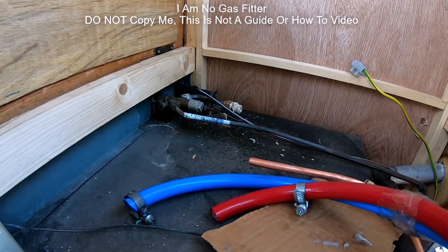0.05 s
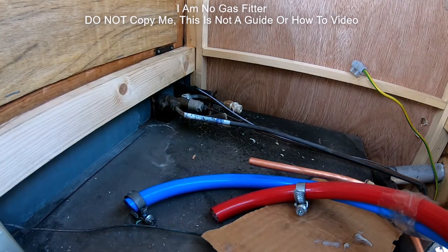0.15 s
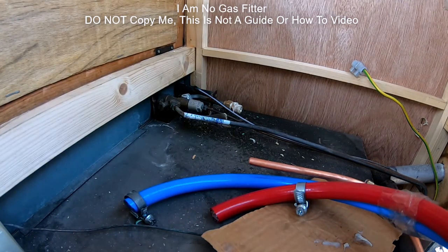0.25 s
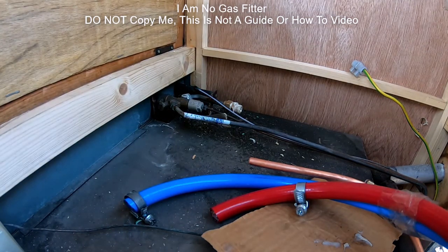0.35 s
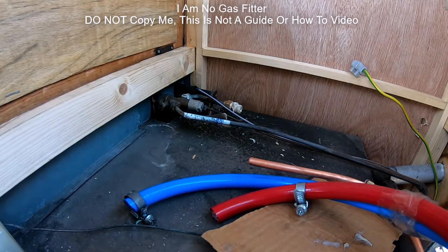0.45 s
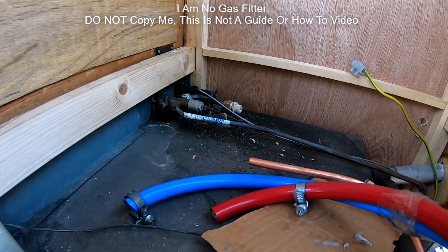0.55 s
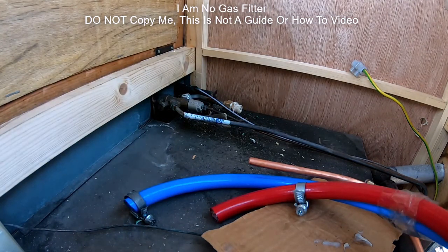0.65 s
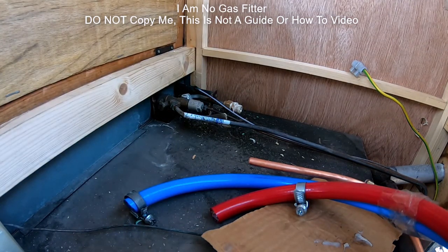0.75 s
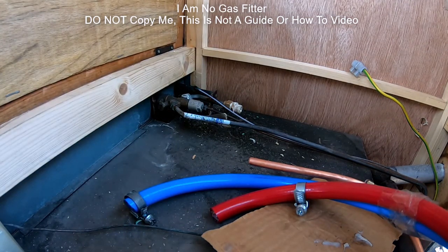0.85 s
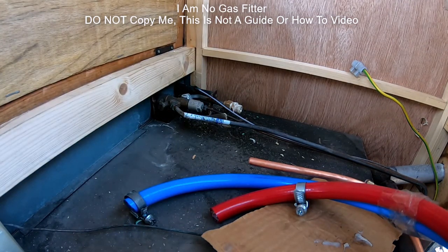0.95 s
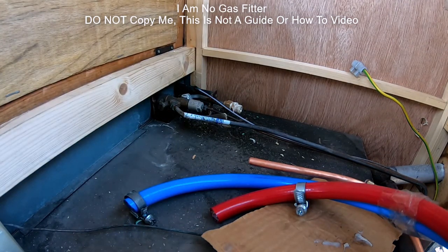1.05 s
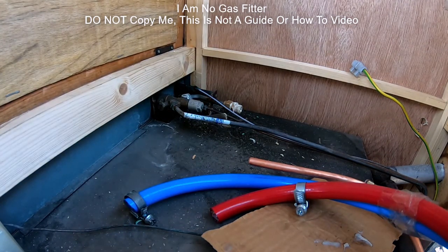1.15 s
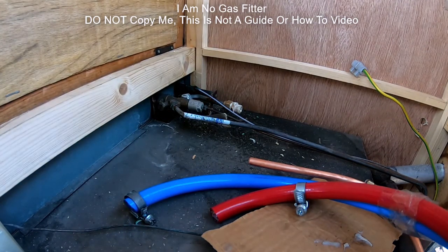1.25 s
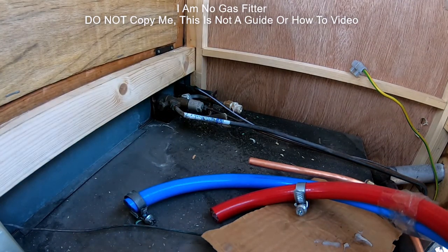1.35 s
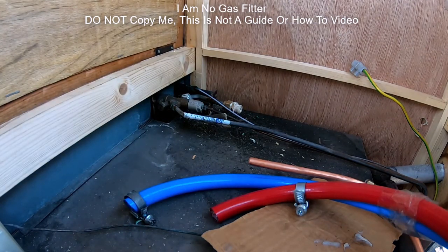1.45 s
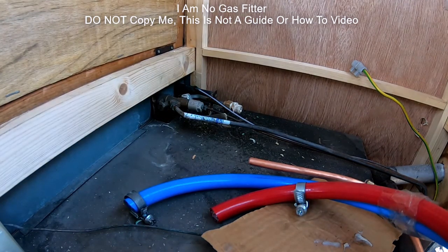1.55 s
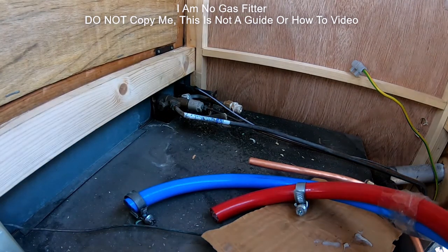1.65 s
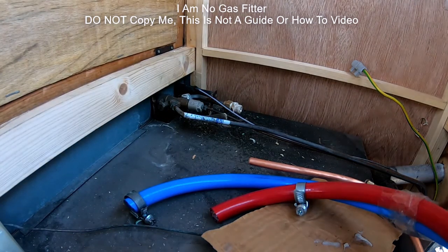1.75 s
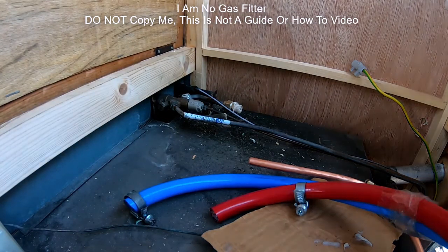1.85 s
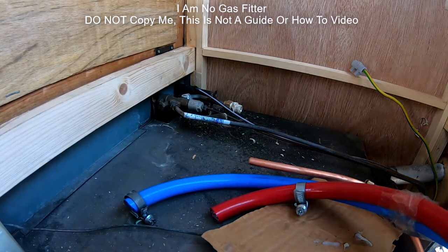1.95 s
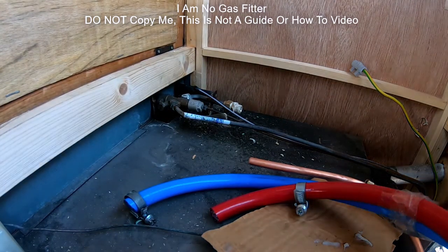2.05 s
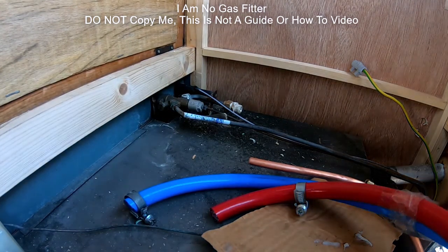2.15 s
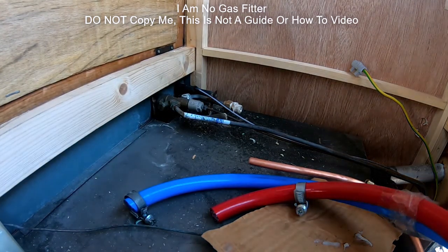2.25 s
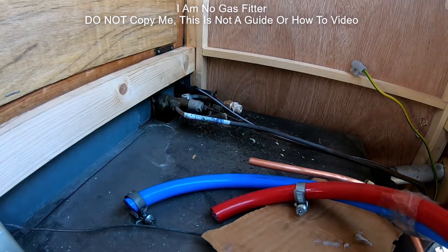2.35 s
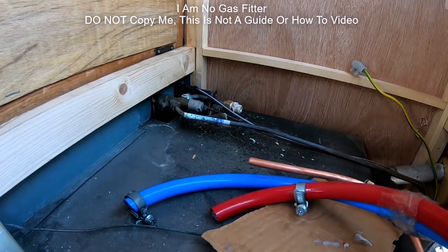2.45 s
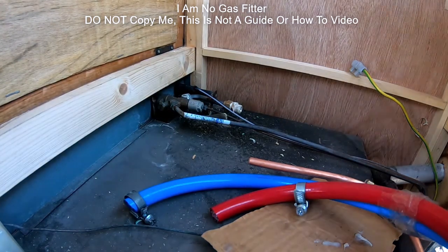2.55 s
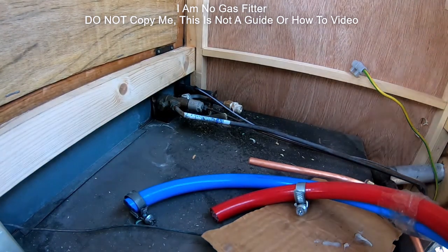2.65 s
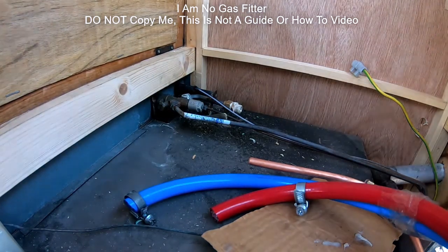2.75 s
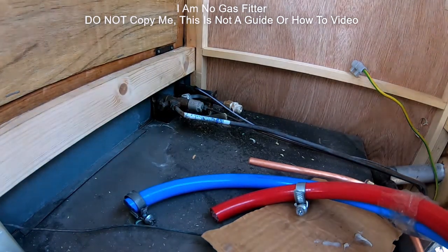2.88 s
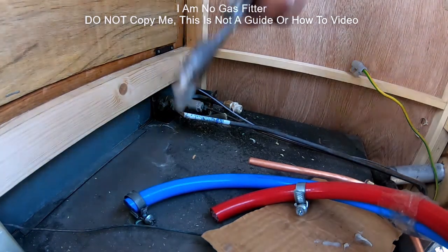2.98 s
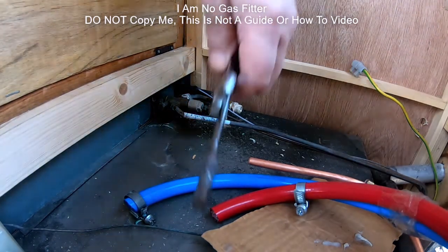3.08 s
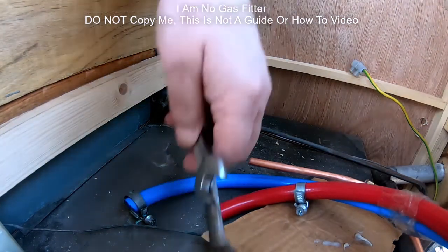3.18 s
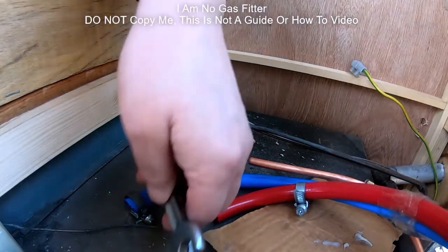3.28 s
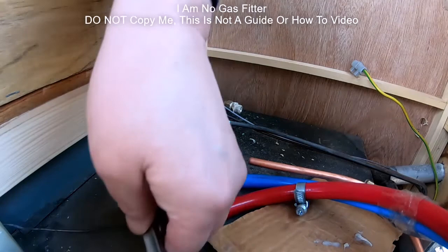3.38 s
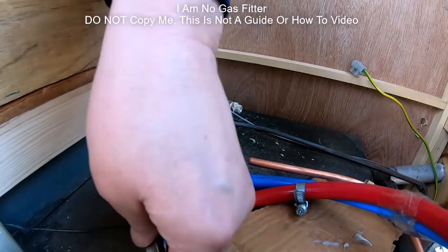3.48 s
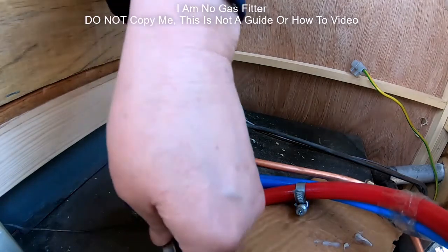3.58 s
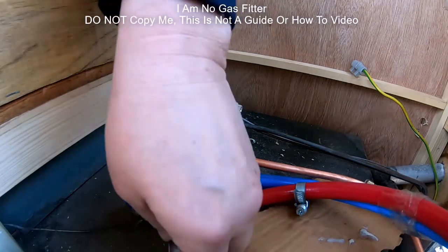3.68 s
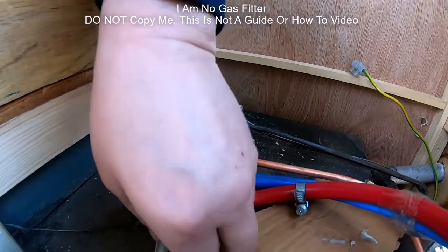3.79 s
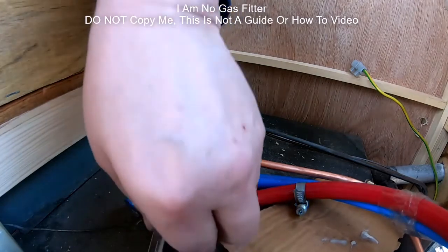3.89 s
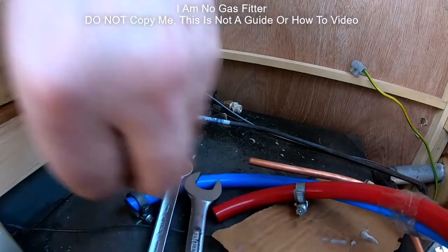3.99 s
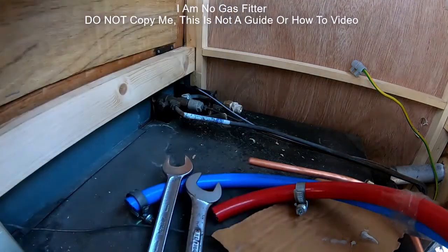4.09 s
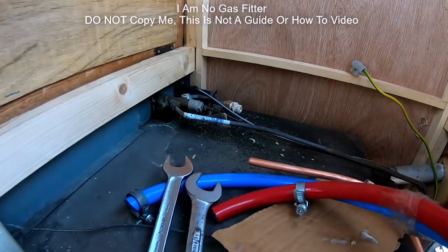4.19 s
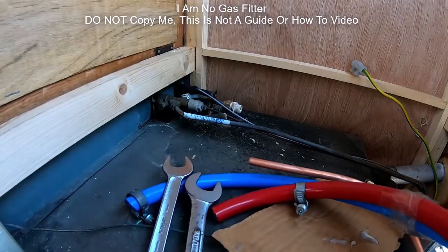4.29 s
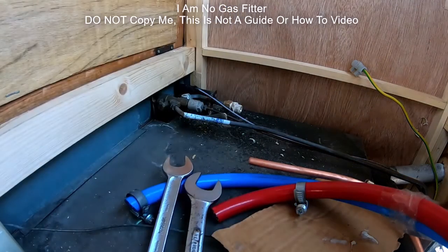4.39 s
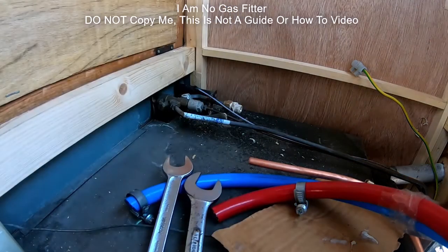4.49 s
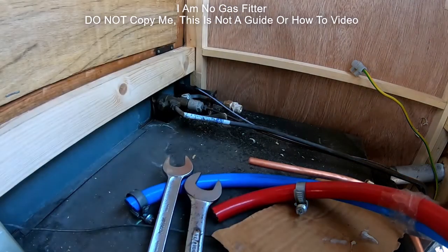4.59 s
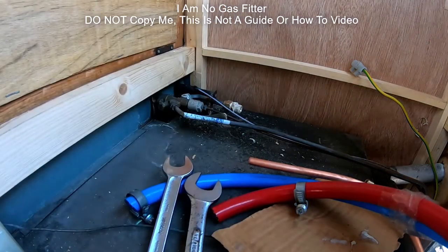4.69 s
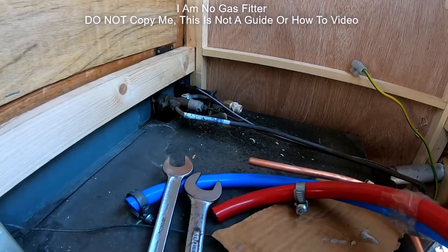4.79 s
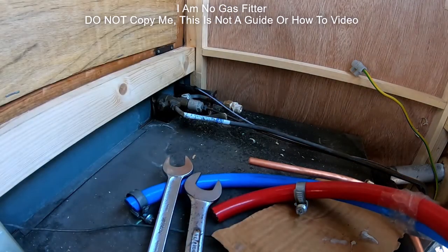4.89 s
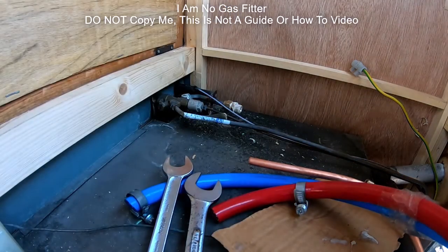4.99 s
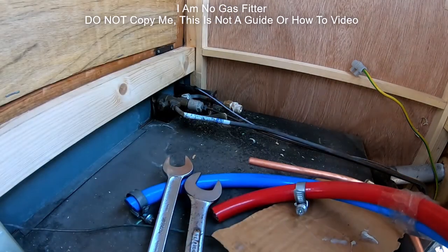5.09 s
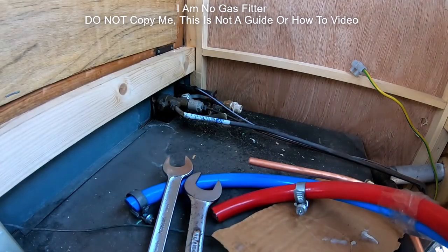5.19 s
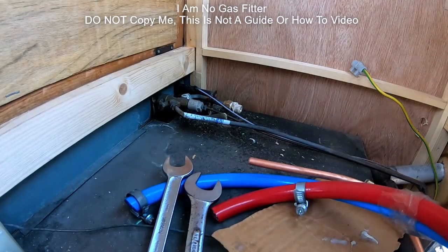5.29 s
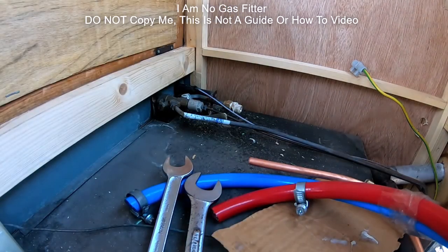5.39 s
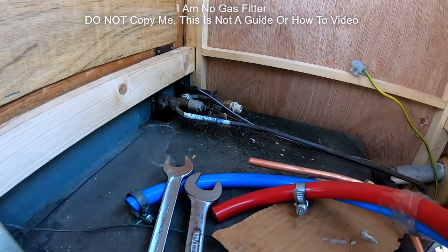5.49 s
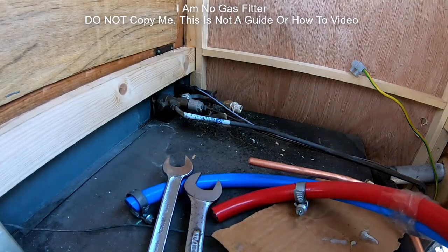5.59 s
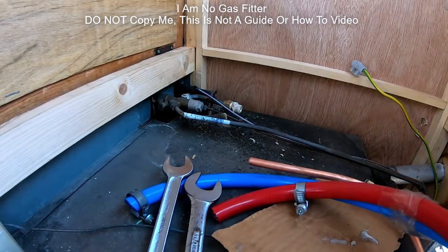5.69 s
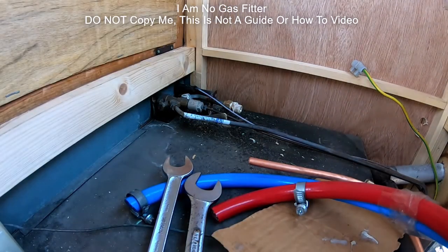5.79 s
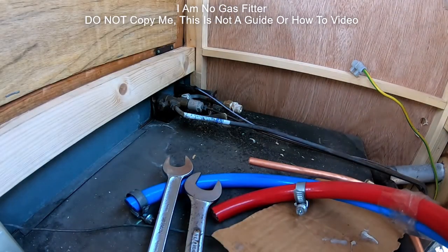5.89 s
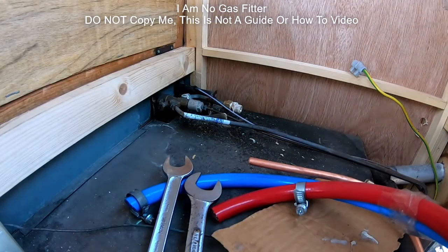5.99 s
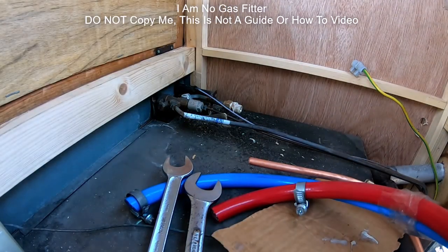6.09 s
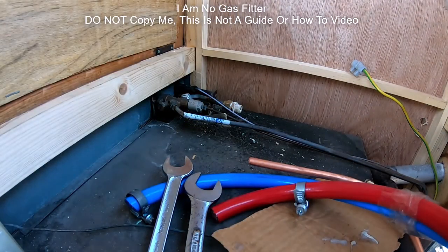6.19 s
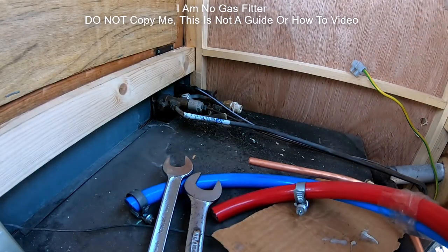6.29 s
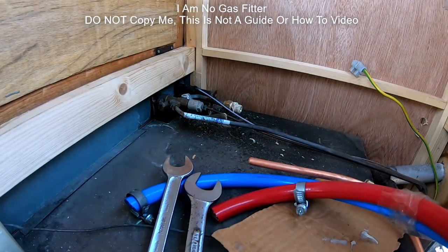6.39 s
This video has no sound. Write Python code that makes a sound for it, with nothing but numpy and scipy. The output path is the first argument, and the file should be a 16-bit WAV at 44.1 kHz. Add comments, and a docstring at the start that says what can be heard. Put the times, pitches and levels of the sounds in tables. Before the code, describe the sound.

Small fittings knock on wood in a van, two steel spanners clink, then clatter onto a hollow floor, one rocking quickly to rest.

```python
"""Two spanners in a plywood-lined van

Hands knock about among small fittings and pick up two steel spanners, which slide and clink together.
The spanners are laid on the hollow floor, clatter, and one rocks to rest. Sleeves rustle over a low hum.
Blows are filtered noise bursts with damped modes; sliding is a train of such contacts; cloth, rumble and
air are shaped noise; the hum is a wavering sine."""
import sys
import numpy as np
from scipy import signal
from scipy.fft import rfft, irfft, next_fast_len
from scipy.io import wavfile
from scipy.ndimage import map_coordinates

SR = 44100
rng = np.random.default_rng(int(sys.argv[2]) if len(sys.argv) > 2 else 0)


def log_audio(samples):
    """Write samples as a 16-bit WAV file to the path given in sys.argv[1]."""
    # one column per channel
    frames = np.atleast_2d(samples).T
    # limit to full scale, then quantise
    limited = np.clip(frames, -1, 1)
    pcm = np.round(limited * 32767).astype(np.int16)
    wavfile.write(sys.argv[1], SR, pcm)


N = 283987
TIME = np.arange(N) / SR
RING = np.arange(SR * 3 // 4) / SR  # time after a blow, s

# modes of the larger and the smaller spanner, ringing freely: (f/Hz, level/dB, t60/s)
LARGE_MODES = [(2010, -17, 0.41), (3336, -5.5, 0.31), (4400, 6.5, 0.26), (7542, -5.5, 0.47),
               (11890, -14, .35), (12526, -24, .25), (13500, -30, .2), (14950, -27.5, .3)]
SMALL_MODES = [(1540, -20.5, 0.35), (2140, -20, 0.19), (2240, -13, .2), (3345, -6.5, 0.18),
               (5426, -1.5, 0.24), (5477, -3, .12), (6860, -13.5, 0.38), (7780, -7.5, 0.27),
               (8140, -2, 0.2), (9670, -22, 0.38), (10500, -17, .16), (11300, -18.5, .2)]
# panel modes of the hollow floor: (f/Hz, level/dB, t60/s)
FLOOR_MODES = [(79.9, -16, 0.58), (147.8, -2, 0.15), (179.3, 4, 0.15), (244.8, 1, 0.18), (287.7, 1, 0.12),
               (395, -6.5, .08), (457.3, 6.5, 0.14), (579, -7.5, 0.13), (673.4, -1.5, 0.099)]
# deep sway of the van's floor: (f/Hz, relative level/dB)
SWAY_SPECTRUM = [(15, -15.5), (30, -11), (50, 2), (75, -0.5), (120, -11.5), (250, -26), (800, -77)]


def amp(db):
    """Level as the logarithm of amplitude: decibels to gain."""
    return 10 ** (np.asarray(db) / 20)


def unit(x):
    """Normalisation by mean power: scale to rms 1."""
    return x / np.sqrt(np.mean(x ** 2) + 1e-20)


def along(points, hz):
    """Logarithmic frequency scale: interpolate (f/Hz, value) points on it."""
    f, v = np.transpose(points)
    return np.interp(np.log(hz + 1), np.log(f + 1), v)


def shape(points):
    """Spectral envelope: level in dB as a function of frequency."""
    return lambda hz: along(points, hz)


def rippled(points, ripple_db, spacing_hz):
    """Local resonance and cancellation: random peaks and dips mark one particular contact spot."""
    knots = rng.standard_normal(512)

    def level(hz):
        ripple = map_coordinates(knots, [hz / spacing_hz], mode="mirror")
        return along(points, hz) + ripple_db * ripple
    return level


def wobble(rate, size=N):
    """Slow random modulation: a smooth curve through rate knots a second."""
    knots = rng.standard_normal(int(size * rate / SR) + 4)
    return map_coordinates(knots, [np.arange(size) * rate / SR])


def coloured(x, level):
    """Minimum-phase filtering: the folded cepstrum makes a causal filter of gain level(Hz) in dB."""
    size = x.shape[-1]
    m = 2 * next_fast_len(size // 2 + 2048)
    log_gain = np.log(amp(level(np.fft.rfftfreq(m, 1 / SR))))
    cepstrum = irfft(log_gain, m)
    cepstrum[1:m // 2] *= 2
    cepstrum[m // 2 + 1:] = 0
    return irfft(rfft(x, m) * np.exp(rfft(cepstrum)), m)[..., :size]


def diffuse(size):
    """Diffuse-field coherence: stereo noise, alike in both channels in the bass, unrelated in the treble."""
    # f/Hz, side minus mid level/dB
    width = [(60, -14.5), (250, -13), (500, -3), (800, -1.5), (1200, 2), (2000, -3), (4000, -2.5),
             (8000, 2.5)]
    mid, side = rng.standard_normal((2, size))
    side = coloured(side, shape(width))
    return unit(np.array([mid + side, mid - side]))


def add(track, s, sound):
    """Superposition: mix a sound into a track at s seconds."""
    part = track[:, round(s * SR):][:, :sound.shape[-1]]
    part += sound[..., :part.shape[1]]


def impact(level, direct_db, t60, late_db, late_t60):
    """Impulse and reverberation: a contact, dense early reflections and a weak late tail."""
    fade = amp(-60 * RING / t60) + amp(late_db - 60 * RING / late_t60)
    echo = diffuse(len(RING)) * fade / np.linalg.norm(fade)
    echo[:, 0] += amp(direct_db)
    # the energy of a 10 ms burst of rms 1
    return unit(coloured(echo, level)) * np.sqrt(SR / (10 * 10 * len(RING)))


def ring(modes, scatter_db, apart):
    """Modal decay: damped sines of random strength, each with opposite phase shifts left and right."""
    out = np.zeros((2, len(RING)))
    for k, (hz, db, t60) in enumerate(modes):
        strength, skew = rng.standard_normal(2)
        phase = apart * skew * np.array([[1], [-1]])
        decay = amp(db + scatter_db * strength - 60 * RING / t60)
        out += (-1) ** k * decay * np.sin(2 * np.pi * hz * RING + phase)
    return out * (1 - np.exp(-RING / 0.00046))


def bounces(s, db, flight_s, loss_db, count=3):
    """Inelastic rebound: the (s, dB) of a blow and its bounces, each weaker and after a shorter flight."""
    k = np.arange(count)
    flights = flight_s * 0.95 ** k
    return zip(s + np.cumsum(flights) - flights, db - abs(loss_db) * k)


def steel(place):
    """Position-dependent excitation: colour shifts from jaw (0) to shank (1), with new ripples each call."""
    # contact at the jaw and at the shank: f/Hz, relative level/dB
    jaw_spectrum = [(500, -39), (1400, -26.5), (2300, -15.5), (3800, -21.5), (4500, -7.5), (5000, -9),
                    (5600, -3.5), (6800, -16.5), (7600, 3), (8300, -0.5), (9800, -15), (11700, -12),
                    (13800, -30.5), (15500, -39)]
    shank_spectrum = [(600, -40), (1700, -18), (2200, -6.5), (2900, -10.5), (3800, 4), (5300, -14.5),
                      (5900, -9.5), (6800, -22), (7600, -5.5), (8400, -10.5), (9500, -38.5), (11400, -35),
                      (13300, -41.5), (15500, -55.5)]
    place = np.clip(place, 0, 1)
    jaw = rippled(jaw_spectrum, ripple_db=8.0, spacing_hz=169.7)
    shank = rippled(shank_spectrum, ripple_db=3.5, spacing_hz=130.6)
    return lambda hz: (1 - place) * jaw(hz) + place * shank(hz)


def clinks():
    """Damping by the grip: bright cracks rebound, and a freer spanner rings louder and longer."""
    # steel on steel: t/s, level/dB, contact place (0 jaw - 1 shank), loss per rebound/dB
    blows = [(2.174, -29.5, 0.99, 17), (2.326, -16.5, 0, 20), (2.334, -14, 0, 5), (2.389, -25, 0.38, 11),
             (2.432, -12, 0.047, 14.5), (2.577, -41.5, 0.58, 16), (2.702, -32, .9, 16),
             (2.828, -19, 0.69, 20), (3.175, -44.5, 0.39, 20.5), (3.347, -12.5, 0.2, 4),
             (3.42, -26, 0.47, 14.5), (3.482, -19.5, 0.27, 3), (3.514, -19, 0.35, 16),
             (3.571, -18, 0.27, 19), (3.719, -17.5, 0.13, 5), (3.757, -16.5, 0.61, 16.5),
             (3.801, -16.5, 0.59, 12.5), (3.858, -21, 0.86, 14.5), (3.903, -24.5, 0.99, 14),
             (4.071, -44.5, 1, 8)]
    # from gripped in the fist (0) to let go (1): t/s, freedom of large spanner, freedom of small
    freedom_curve = [(2.17, 0.2, 0.4), (2.4, 0.36, 0.4), (2.75, 0.1, 0), (3.4, 0.4, .35), (3.6, 0.07, 0.2),
                     (3.72, 0.45, 0.72), (3.81, 0.99, .88), (3.92, 0.51, 0.89), (4.07, 0.88, .25)]
    free_ring_db, grip_loss_db = 0.5, 26  # boost of a free spanner's modes; loss at zero freedom
    out = np.zeros((2, N))
    times, *freedoms = np.transpose(freedom_curve)
    for start, blow_db, place, loss_db in blows:
        modes = []
        for spanner, freedom in zip([LARGE_MODES, SMALL_MODES], freedoms):
            free = np.clip(np.interp(start, times, freedom), .1, 1)
            gain_db = free_ring_db - grip_loss_db * (1 - free)
            modes += [(hz, db + gain_db, t60 * free) for hz, db, t60 in spanner]
        colour = steel(place)
        for s, db in bounces(start, blow_db, flight_s=0.014, loss_db=loss_db):
            crack = impact(colour, direct_db=-21.0, t60=0.064, late_db=-36, late_t60=0.65)
            add(out, s, amp(db - 6) * (crack + ring(modes, scatter_db=2, apart=0.79)))
    return out


def slides():
    """Stick-slip friction: a stream of tiny contacts keeps the damped modes ringing."""
    # steel sliding on steel: start t/s, length/s, level/dB, contact place (0 jaw - 1 shank)
    strokes = [(2.168, 0.034, -30, 0.73), (2.206, 0.044, -29, 0.42), (2.245, 0.081, -37.5, 0.42),
               (2.388, 0.037, -35, 0.45), (2.482, 0.38, -68, 0.7), (2.736, 0.059, -33.5, 0.94),
               (3.014, 0.056, -48, 0.65), (3.13, 0.032, -57, .8), (3.197, 0.078, -38.5, 0.49),
               (3.283, 0.07, -53, 0.8), (3.325, 0.024, -37.5, 0.63)]
    out = np.zeros((2, N))
    held = [(hz, db, t60 * 0.15) for hz, db, t60 in LARGE_MODES + SMALL_MODES]
    for s, length, db, place in strokes:
        size = int(length * SR)
        swell = np.sin(np.pi * np.arange(size) / size) ** .5
        grains = swell * unit(rng.standard_normal(size) * amp(0.77 * wobble(510, size)))
        contact = impact(steel(place), direct_db=-6.5, t60=0.065, late_db=-32.0, late_t60=0.28)
        body = contact + amp(-15.0) * ring(held, scatter_db=5.5, apart=0.55)
        body /= np.linalg.norm(body[0])
        add(out, s, amp(db) * signal.fftconvolve(grains[None], body, axes=1))
    return out


def landings():
    """Plate radiation: the hollow floor booms and sways, hard contacts clack, the first one rings a pipe."""
    # spanner on floor: t/s, level/dB, hardness/dB, first flight/s, loss per bounce/dB (sign ignored)
    blows = [(3.480, -21.5, 7, 0.013, 14.5), (3.507, -12, 2.5, .009, 10), (3.573, -22.5, 1.5, 0.018, 12.5),
             (3.621, -26.5, 1, 0.034, -0.5), (3.707, -11, -3, .015, 2.5), (3.757, -18, 1, 0.01, -0.5),
             (3.793, -14.5, 3, .013, 6), (3.862, -16.5, -0.5, 0.013, 14), (3.889, -6, -6.5, .015, 1),
             (3.945, -15, -6.5, .018, 1.5), (4.067, -17, -1.5, 0.013, 13.5), (4.082, -11, -4, .018, 6.5)]
    # boom of the floor panel, and clack of the contact: f/Hz, relative level/dB
    panel_spectrum = [(30, -32.5), (90, -9.5), (170, 9.5), (280, 8.5), (345, 6), (450, 5.5), (700, -17),
                      (1000, -35), (1600, -25.5), (3000, -44.5), (8000, -67.5)]
    clack_spectrum = [(200, -21), (500, 3.5), (780, 8), (1100, -1), (1550, 1.5), (2200, -2.5), (3000, -10),
                      (5000, -22.5), (8000, -30), (11000, -46.5)]
    # the board gives under the blow: f/Hz, level/dB, t60/s
    push_modes = [(188.4, -1.5, 0.036), (297, 0, .03), (472, -16.5, 0.017)]
    # a copper pipe brushed on the way down: f/Hz, level/dB, t60/s
    pipe_modes = [(703, -2.5, 0.17), (807, 2, 0.06), (1225, -9, 0.085)]
    out = np.zeros((2, N))
    for start, blow_db, hard_db, flight_s, loss_db in blows:
        for s, db in bounces(start, blow_db, flight_s, loss_db):
            boards = amp(-14) * ring(FLOOR_MODES, scatter_db=4, apart=0.15)
            panel = impact(shape(panel_spectrum), direct_db=-9.0, t60=0.0608, late_db=-20.5, late_t60=0.71)
            spot = rippled(clack_spectrum, ripple_db=5.0, spacing_hz=109.8)
            clack = impact(spot, direct_db=-17, t60=0.14, late_db=-19.5, late_t60=0.23)
            push = amp(-12.0) * ring(push_modes, scatter_db=2.5, apart=0.055)
            add(out, s, amp(db) * (push + boards + amp(-6.0) * panel + amp(hard_db - 13.0) * clack))
        sway = impact(shape(SWAY_SPECTRUM), direct_db=-14, t60=0.13, late_db=-13.5, late_t60=.8)
        add(out, start, amp(blow_db - 21.5) * sway)
    add(out, blows[0][0], amp(-23) * ring(pipe_modes, scatter_db=0.5, apart=0.81))
    return out


def swings(count):
    """Dissipative rocking: the (s, dB, side 0 or 1) of landings that come ever faster and weaker."""
    start_s, swing_s, shrink = 4.1895, .0534, 0.95  # first landing, first swing, ratio of successive swings
    limp_s, limp_shrink = 0.0067, .6  # side 1 lands early at first, then the swings even out
    first_db, loss_db, loss_grows_db = -21, 0.98, 0.036  # mean loss per swing grows as friction takes over
    k = np.arange(count)
    side = k % 2
    lengths = swing_s * shrink ** k
    times = start_s + np.cumsum(lengths) - lengths - side * limp_s * limp_shrink ** k
    return zip(times, first_db - (loss_db + loss_grows_db * k) * k, side)


def rocking():
    """Alternating contact: each swing lands in two steps, jaw then handle, with a faint ring of steel."""
    # jaw, then handle: delay/s, level/dB
    steps = [(0, -10.5), (.0045, -7)]
    # the floor under the rocking spanner: f/Hz, relative level/dB
    floor_spectrum = [(40, -23), (110, 3.5), (180, 13.5), (260, 8.5), (345, 1.5), (470, 1), (560, -2),
                      (680, -11), (900, -31.5), (1250, -51), (1600, -15.5), (2100, -34.5), (3400, -42.5),
                      (8000, -75)]
    # the rocking spanner: f/Hz, level/dB, t60/s
    pivot_modes = [(3290, 6.5, 0.06), (4400, -12, .06), (5440, -3.5, .05), (8130, -1.5, 0.075),
                   (10470, -17, .1)]
    out = np.zeros((2, N))
    for s, db, side in swings(count=14):
        for delay, step_db in steps:
            panel = impact(shape(floor_spectrum), direct_db=-2.5, t60=0.05, late_db=-25, late_t60=.6)
            boards = amp(-17.5) * ring(FLOOR_MODES, scatter_db=0.0, apart=0.071)
            add(out, s + delay, amp(db + step_db) * (panel + boards))
        tick = impact(steel(place=0.94), direct_db=-6, t60=0.053, late_db=-21, late_t60=0.25)
        tick += amp(5.5) * ring(pivot_modes, scatter_db=3.0, apart=0.69)
        # weaker on every second swing
        add(out, s + 0.0019, amp(-74.5 - 7 * side) * tick)
    return out


def knocks():
    """Successive contact: a fitting meets wood in three steps that share one spot's resonances."""
    # fittings knocked against wood: t/s, level/dB
    blows = [(0.526, -25), (0.574, -39), (0.631, -27.5), (1.168, -46.5), (1.617, -44.5), (1.664, -36),
             (1.821, -37.5), (2.099, -38), (4.867, -49), (4.902, -46)]
    # an edge touches, the face lands, it settles: delay/s, level/dB
    steps = [(0, -3), (.007, 0.5), (.022, -14)]
    # f/Hz, relative level/dB
    wood_spectrum = [(60, -14.5), (150, 3.5), (250, 9), (390, -9.5), (500, -5), (620, -8), (800, -4.5),
                     (1080, -3.5), (1450, -11.5), (1750, -12.5), (2600, -25), (3500, -35), (8000, -64),
                     (14000, -70)]
    out = np.zeros((2, N))
    for s, db in blows:
        spot = rippled(wood_spectrum, ripple_db=3, spacing_hz=102)
        for delay, step_db in steps:
            contact = impact(spot, direct_db=-11.0, t60=0.089, late_db=-16.5, late_t60=.25)
            add(out, s + delay, amp(db + step_db - 5) * contact)
    return out


def thumps():
    """Soft excitation: padded thumps drive mostly the low frequencies of the plywood."""
    # t/s, level/dB
    blows = [(2.239, -15), (4.873, -35.5), (5.312, -32.5), (5.45, -19), (5.478, -40)]
    # f/Hz, relative level/dB
    plywood_spectrum = [(30, -32), (70, -2.5), (120, -2), (185, 5), (300, -6.5), (430, -15), (560, -17.5),
                        (700, -24.5), (1200, -26), (1800, -36), (5000, -50), (12000, -75)]
    out = np.zeros((2, N))
    for s, db in blows:
        thump = impact(shape(plywood_spectrum), direct_db=-10, t60=0.1, late_db=-23.5, late_t60=0.56)
        add(out, s, amp(db - 6.5) * thump)
    return out


def bumps():
    """Low-frequency loading: soft shifts of weight sway the floor."""
    # t/s, level/dB
    shifts = [(1.618, -39.5), (1.699, -41.5), (6.337, -36), (6.351, -34)]
    out = np.zeros((2, N))
    for s, db in shifts:
        bump = impact(shape(SWAY_SPECTRUM), direct_db=-5, t60=0.087, late_db=-20.5, late_t60=.4)
        add(out, s, amp(db) * bump)
    return out


def ticks():
    """Small stiff resonator: a brass fitting ticks, strongest around 4 kHz."""
    # t/s, level/dB
    touches = [(1.668, -58), (5.14, -53), (5.45, -37.5), (5.52, -58), (5.695, -48), (5.849, -48.5),
               (6.289, -55.5)]
    # f/Hz, relative level/dB
    brass_spectrum = [(600, -21), (2000, -28), (3300, -9.5), (3750, 2), (4200, -8.5), (6000, -23),
                      (7800, -20), (9500, -33.5), (15000, -51)]
    out = np.zeros((2, N))
    for s, db in touches:
        tick = impact(shape(brass_spectrum), direct_db=-29, t60=0.11, late_db=-21, late_t60=0.34)
        add(out, s, amp(db - 7) * tick)
    return out


def sleeves():
    """Friction noise: each stroke of cloth swells, holds and dies away, rubbing in uneven patches."""
    # start t/s, length/s, level/dB, brightness (0 dull rub - 1 light brush)
    strokes = [(0.098, 0.23, -76.5, 1), (0.724, 0.042, -71, 1), (1.145, 0.83, -72, .9),
               (1.334, 0.072, -64.5, 0.82), (1.597, .08, -58, 0.45), (1.847, 0.27, -68.5, 1),
               (4.775, 0.444, -59.5, 0), (5.093, 0.065, -54.5, 0.16), (5.246, 0.29, -63, 0),
               (5.454, 0.067, -57.5, 0), (5.608, .57, -65.5, 0.15), (5.825, 0.028, -58.5, 0),
               (6.264, 0.04, -58, 0.021), (6.395, .04, -63.5, 0.29)]
    # light brush, then dull rub: each f/Hz, relative level/dB
    cloth_spectra = [
        [(1060, -29), (1800, -3), (1920, -6), (4070, -10), (8350, -7.5), (10100, -21), (12700, -34.5),
         (15000, -51.5)],
        [(290, -32), (500, -11.5), (655, -9.5), (835, -7), (2230, -10.5), (3460, -11), (3770, -13),
         (4050, -9.5), (6570, -26), (7910, -24.5), (15000, -56)],
    ]
    attack_s, release_s = 0.029, 0.043
    power = np.zeros((2, N))
    for s, length, db, bright in strokes:
        rise = np.clip((TIME - s) / attack_s, 0, 1)
        fall = np.exp(-np.maximum(TIME - s - length, 0) / release_s)
        bright = np.clip(bright, 0, 1)
        power += np.outer([bright, 1 - bright], (amp(db) * rise * fall) ** 2)
    out = np.zeros((2, N))
    for p, spectrum in zip(power, cloth_spectra):
        rub = coloured(diffuse(N), shape(spectrum)) * amp(1.7 * wobble(70))
        out += np.sqrt(p) * unit(rub)
    return out


def background():
    """Tonal and broadband noise: a wavering hum, a rumble that swells with it, and faint outdoor air."""
    # t/s, hum level/dB
    hum_curve = [(0, -58), (1.1, -55), (2.2, -58.5), (3.3, -59.5), (4.9, -48.5), (5.7, -50), (6.44, -56.5)]
    # f/Hz, relative level/dB
    rumble_spectrum = [(20, -24), (40, -2.5), (70, 5), (130, -9), (180, 2), (280, -6.5), (400, -19),
                       (700, -38), (2000, -65.5)]
    air_spectrum = [(12, -57.5), (20, -23.5), (119, -3.5), (140, -13), (180, -13.5), (274, -15),
                    (452, -46.5), (649, -28.5), (746, -20.5), (958, -21.5), (1580, -26.5), (2030, -39.5),
                    (5380, -48.5), (8170, -47), (15500, -77)]
    hum_db = np.interp(TIME, *np.transpose(hum_curve))
    rumble_db = -54.5 + 0.77 * (hum_db - hum_db.mean())  # 0.77 dB of rumble per dB of hum
    pitch_hz = 114.5 + 2 * wobble(7.3)
    tone = np.sin(2 * np.pi * np.cumsum(pitch_hz) / SR)
    hum = amp(hum_db) * unit(tone * amp(2.7 * wobble(16)))
    rumble = amp(rumble_db) * unit(coloured(diffuse(N), shape(rumble_spectrum)))
    air = amp(-56.5) * unit(coloured(diffuse(N), shape(air_spectrum)))
    return hum + rumble + air


def scene():
    """Interchannel level difference: clinks and slides move with the hand, their highest partials lean left."""
    # where the spanners are: t/s, left minus right level/dB
    hand = [(2.17, 2), (2.43, 1), (2.78, -2), (3.3, -0.5)]
    # f/Hz, left minus right level/dB
    lean = [(100, -4), (7500, 0.5), (9000, 2), (12000, 2)]
    pan_db = np.interp(TIME, *np.transpose(hand))
    left, right = (clinks() + slides()) * amp([pan_db / 2, -pan_db / 2])
    left = coloured(left, lambda hz: along(lean, hz) / 2)
    right = coloured(right, lambda hz: -along(lean, hz) / 2)
    spanners = np.array([left, right]) + landings() + rocking()
    return spanners + knocks() + thumps() + bumps() + ticks() + sleeves() + background()


def record(dry):
    """Mid-side width and band limit: the image narrows for a while, most in the lows; the top is cut."""
    # how far the stereo image closes in: t/s, amount (0-1)
    narrowing = [(3.6, 0), (4, 0.62), (4.35, 1), (5.7, 1), (6.44, 0.26)]
    split_hz, top_hz = 2400, 15800
    m = next_fast_len(N + SR // 2)
    hz = np.fft.rfftfreq(m, 1 / SR)
    mid, side = (dry[0] + dry[1]) / 2, (dry[0] - dry[1]) / 2
    low = irfft(rfft(side, m) / (1 + (hz / split_hz) ** 4), m)[:N]
    amount = np.clip(np.interp(TIME, *np.transpose(narrowing)), 0, 1)
    side = amp(-23 * amount) * low + amp(-7 * amount) * (side - low)
    stereo = np.array([mid + side, mid - side])
    return irfft(rfft(stereo, m) * (hz < top_hz), m)[:, :N]


dry = scene()
out = record(dry)
log_audio(out)
```